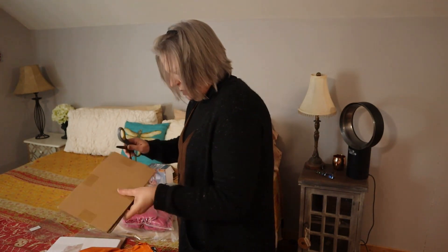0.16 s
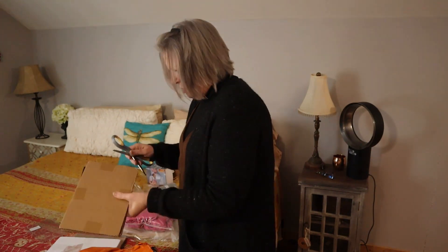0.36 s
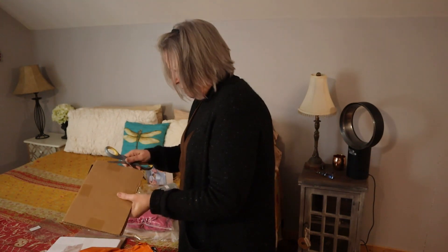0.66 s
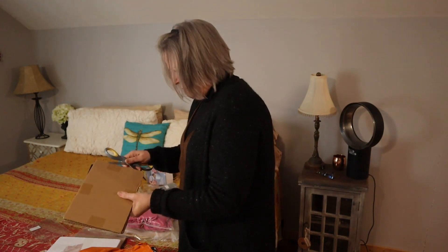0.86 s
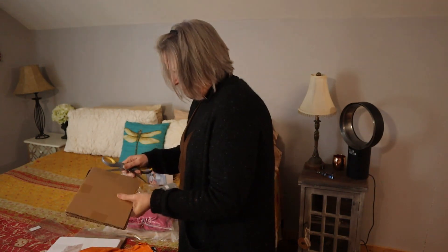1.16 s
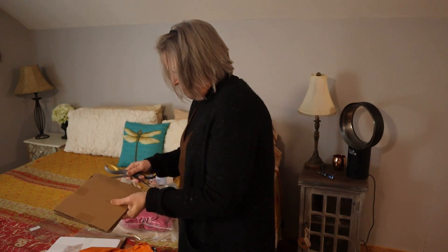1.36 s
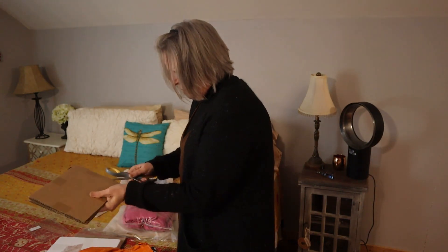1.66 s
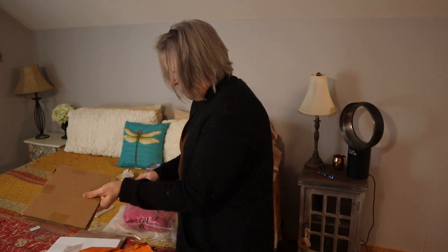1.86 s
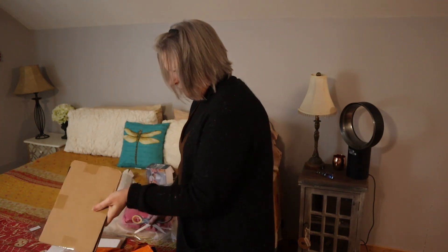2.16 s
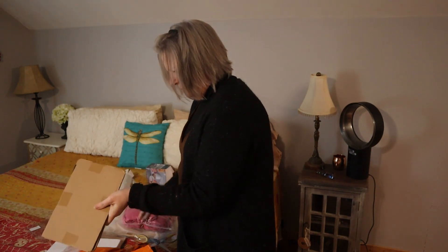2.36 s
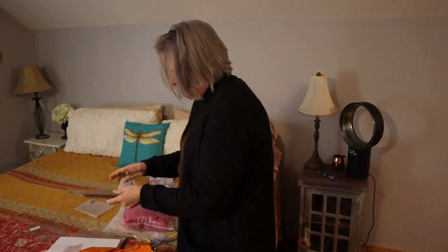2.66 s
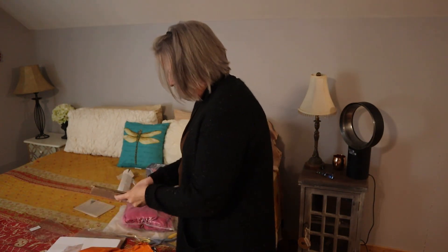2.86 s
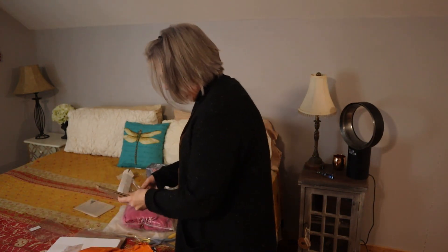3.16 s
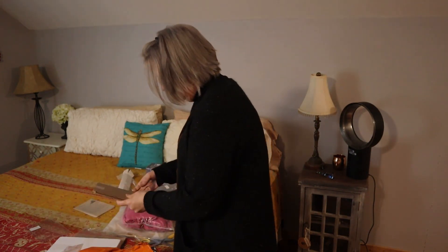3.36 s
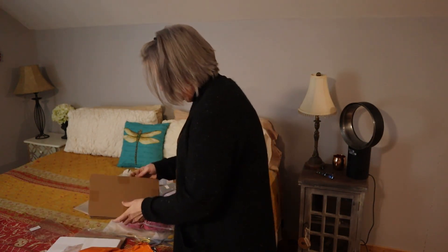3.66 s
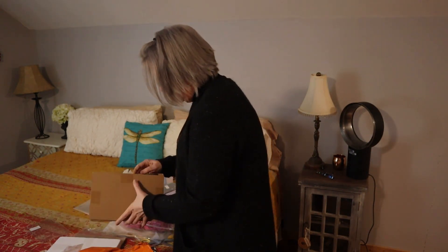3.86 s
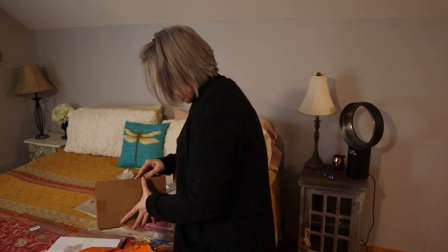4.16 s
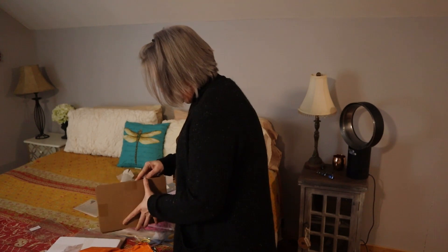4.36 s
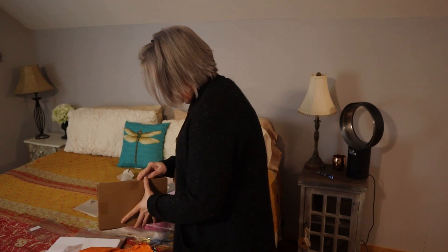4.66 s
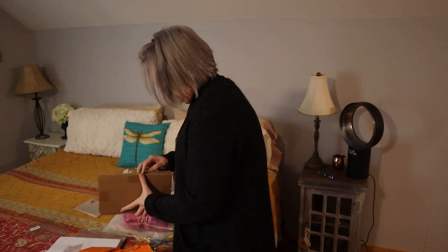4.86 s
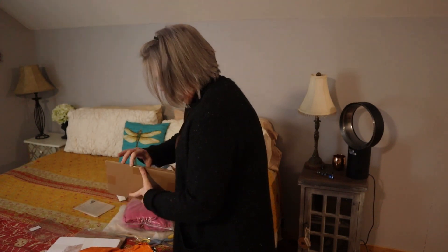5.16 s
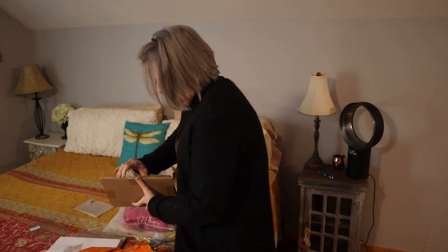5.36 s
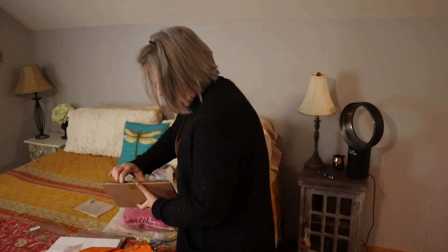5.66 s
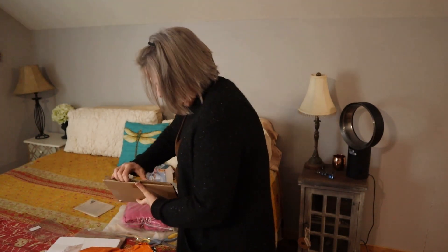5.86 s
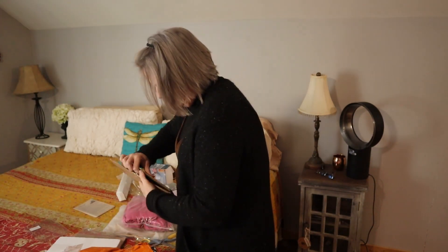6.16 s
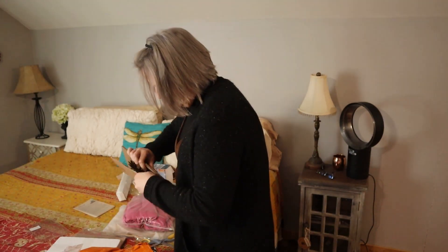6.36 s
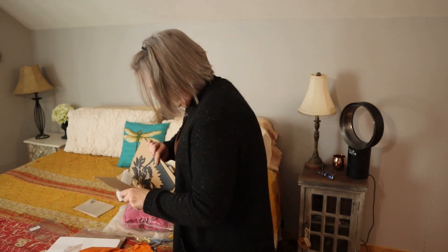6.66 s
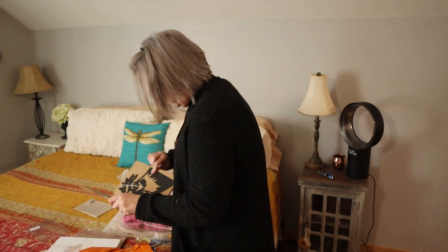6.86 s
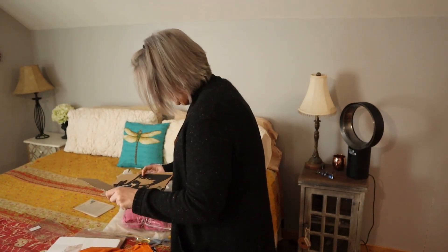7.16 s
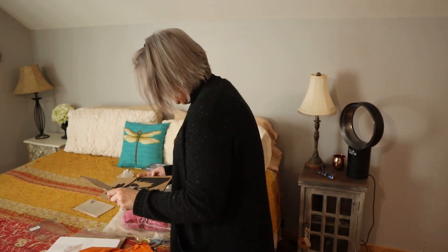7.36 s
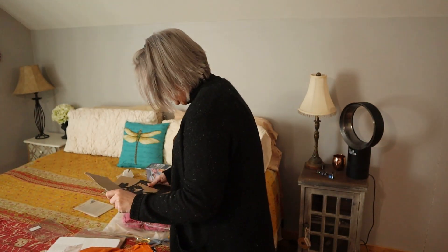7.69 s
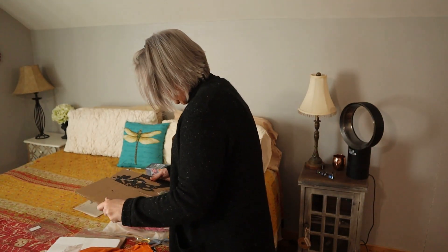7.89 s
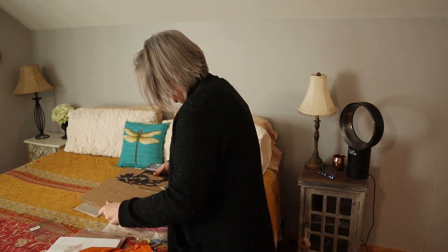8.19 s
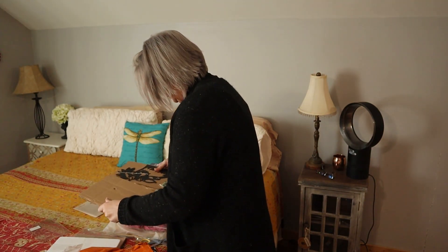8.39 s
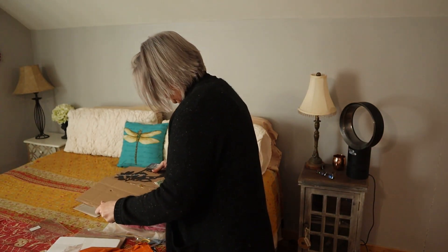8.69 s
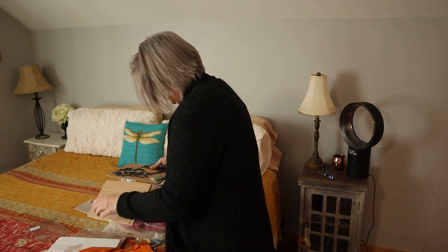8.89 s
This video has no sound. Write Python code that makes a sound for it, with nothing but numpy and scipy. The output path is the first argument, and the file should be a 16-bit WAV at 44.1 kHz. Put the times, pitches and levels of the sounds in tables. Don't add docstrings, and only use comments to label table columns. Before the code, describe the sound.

A small furnished room with steady soft hiss, low rumble and a faint motor hum, heard in stereo from some steps away. At 0 s hands rub cardboard with a light, gritty rasp and small knocks near 0.3-0.4 s, then near quiet. Sharp snaps start at 1.2 s and thicken into a harsh crunching, ripping burst at 1.5-1.85 s. Quiet follows, with a soft knock and crackle around 2.4-2.5 s. From 3.3 to 4.3 s come rasping strokes, snaps and tape ticks; at 4.6-5.3 s brisk ticks and hard cracks. Prying scrapes follow, with a loud double snap at 6.06 s. At 6.57 s a flap tears free with a very loud ringing pop, again at 6.87 s slightly lower, the hiss ducking briefly. Fibre ticks and scrapes continue, with a woody knock at 7.8 s, a strong snap at 8.46 s and last crackles near 8.9 s.

```python
import sys
import numpy as np
from scipy import signal
from scipy.fft import rfft, irfft, next_fast_len
from scipy.io import wavfile
from scipy.ndimage import map_coordinates

SR = 44100
rng = np.random.default_rng(int(sys.argv[2]) if len(sys.argv) > 2 else 0)


def unload_audio(sound):
    columns = np.transpose(np.atleast_2d(sound))
    steps = np.round(np.clip(columns, -1, 1) * 32767)
    wavfile.write(sys.argv[1], SR, steps.astype(np.int16))


def invert_db(level):
    return 10 ** (np.asarray(level, dtype=float) / 20)


N = 398223

# freq_hz, density_db
HISS_SPECTRUM = [(12, -43), (20, 8), (53, -6.5), (222, -8), (263, -8), (348, -10), (501, -10.5),
                 (1070, -17.5), (1260, -16.5), (1980, -19.5), (9750, -25), (12600, -24), (16200, -27)]
# freq_hz, likeness
HISS_LIKENESS = [(60, 0.99), (130, 0.74), (290, 0.41), (640, 0.19), (3000, 0.27), (15000, 0.3)]
# freq_hz, width_hz, level_db
MOTOR_HUM = [(56, 4.3, -62.5), (117.6, 8, -69)]

# start_s, rasp_db
HAND_CONTACT = [(0, -54), (.384, -53), (.558, -72), (1.2, -80), (1.24, -46), (2.2, -70), (3.17, -64),
                (3.6, -46), (4.2, -60), (4.8, -72), (5.0, -47), (5.28, -58), (5.5, -47), (6.45, -46),
                (7.59, -65), (7.95, -41), (8.4, -60), (9.03, -56)]
# peak_s, rasp_db, rise_20db_s, fall_20db_s,
# scrape_over_rasp_db
BOARD_STROKES = [(0.001, -40, .01, .14, -9), (.13, -38, .08, .3, -12), (.23, -46, .15, .25, -12),
                 (1.45, -39, .4, .15, -15), (1.53, -23, .04, .05, -1), (1.785, -20, .06, .06, -6),
                 (1.817, -17, .025, .022, -14), (1.84, -37.5, .02, .23, -5), (3.07, -51, .15, .05, -9),
                 (3.275, -46, .1, .1, -6), (3.408, -40, .4, .05, -19), (3.524, -31.5, .09, .02, -13),
                 (3.74, -30, .2, .2, -10), (4.03, -32, .5, .14, -12), (4.858, -38.5, .09, .8, -8),
                 (5.226, -41, .3, .07, -11),
                 (5.755, -37, .09, .25, -12), (5.925, -31, .16, .045, -9), (6.4, -40, .25, .18, -10),
               (6.51, -43, .3, .04, -12), (6.64, -23, .05, .2, -4), (6.69, -24, .07, .09, -3.5),
               (6.79, -37, .2, .15, -3), (7.33, -38, .07, .1, -10), (7.45, -41, .2, .05, -13),
               (7.678, -30.5, .05, .08, -11), (7.815, -28, .04, .06, -12), (8.11, -32, .08, .15, -14),
               (8.33, -44, .05, .05, -4), (8.447, -22, .025, .09, -16), (8.56, -30, .13, .09, -18),
               (8.878, -30.5, .085, .11, -6)]
# peak_s, rasp_db, fall_20db_s, scrape_over_rasp_db, panel_over_rasp_db
FOLD_CRUNCHES = [(.322, -29, .025, -8, -13), (1.214, -26, .014, -12, -25), (1.616, -17, .018, -8, -8),
                 (1.623, -18, .012, -8, -12), (1.699, -23, .01, -8, -18), (1.734, -21, .025, -5, -7),
                 (1.748, -15, .018, -8, -15), (2.43, -35, .045, 4, 2), (2.514, -26, .075, -6, -5),
                 (2.846, -44, .063, -8, -20), (3.437, -29, .04, -1.5, -7), (3.538, -15, .008, -10, -13),
                 (4.25, -41, .13, -19, -22), (4.49, -41, .07, -8, -14), (4.936, -26, .07, -10, -20),
                 (5.334, -21, .025, -16, -18), (5.34, -30, .07, -6, -4), (6.067, -24, .045, 0, -4),
                 (6.085, -32, .26, -6, -9), (6.592, -15, .14, -3, -9), (6.876, -18.5, .13, -4, -3),
                 (7.228, -42, .4, -14, -25), (7.825, -37, .1, .5, 7), (8.466, -24, .03, -1.5, -10)]
# freq_hz, density_db
RASP_SPECTRUM = [(1470, -49), (2500, -10.5), (3630, -4.5), (3950, -1), (6550, 1), (7950, 0), (10000, -7.5),
                 (15200, -21.5), (16000, -85)]
# freq_hz, density_db
SCRAPE_SPECTRUM = [(700, -5), (1000, 2.5), (2000, 3.5), (3000, -2.5), (4200, -16)]
# freq_hz, width_hz, level_db
PANEL_MODES = [(173, 87, -9), (320, 254, 0.5), (460, 356, 1.5), (680, 177, 1), (880, 217, -10)]

# start_s, peak_db, crack_hz, panel_over_peak_db, panel_hz
PANEL_KNOCKS = [(.3072, -23, 4290, -12, 1380), (.4125, -26.5, 3370, -12, 1850),
                (1.2101, -14, 5500, -21, 1000), (1.3204, -16.5, 7610, -17.5, 1950),
                (1.4351, -23, 4530, -15, 1790), (1.5304, -5.5, 4350, -24, 541),
                (2.4264, -20, 7010, -16, 1520), (3.3162, -13, 6500, -16, 2200),
                (3.4346, -14, 4040, -21, 1390), (3.6711, -18, 6440, -19, 1500),
                (3.6945, -19, 6520, -9, 1010), (4.0277, -15, 6770, -25, 1940),
                (4.4807, -28, 4320, -16, 428), (4.9347, -14, 4480, -18, 1040),
                (5.2984, -18, 4550, -8, 2300), (5.3138, -5, 8680, -24.5, 1430),
                (5.7059, -23.5, 4890, -19, 1040), (6.0573, -4, 5300, -30, 1870),
                (6.0624, -7, 5900, -9, 1870), (6.3974, -21.5, 4750, -13, 1330),
                (7.2315, -17, 4390, -24, 1460), (7.6271, -30, 6590, -14, 1480),
                (7.7967, -12.5, 4480, -20.5, 312), (8.4642, -8, 3600, -27, 1500),
                (8.9905, -19, 6420, -17.5, 875)]
# start_s, peak_db, crack_hz, panel_over_peak_db, panel_hz
TEARING_SNAPS = [(.3227, -36, 6220, -21, 1730), (1.5179, -18.5, 5290, -11.5, 794),
                 (1.611, -10, 7600, -17, 606), (1.694, -19, 6670, -19.5, 961),
                 (1.731, -16, 5920, -20.5, 447), (1.8113, -18.5, 6420, -3, 1890),
                 (2.4972, -30, 2760, -8, 700), (3.5169, -24, 4500, -24, 1430),
                 (3.5354, -17, 4950, -12, 1390), (5.1951, -21.5, 6720, -27, 1650),
                 (5.3338, -18, 8200, -29, 2000), (5.7498, -19, 7260, -20.5, 1340),
                 (5.9145, -16.5, 5880, -22, 1320), (6.113, -19, 3900, -32, 1910),
                 (7.008, -19, 4200, -40, 589), (7.458, -24, 7120, -24, 1370), (7.8171, -12, 5900, -17, 323),
                 (7.981, -28, 5500, -20, 1150), (7.9915, -24, 5300, -14, 1150),
                 (8.1015, -18.5, 7880, -25, 1380), (8.4517, -19, 5540, -24, 1930),
                 (8.8667, -11.5, 5550, -28, 1140)]
# start_s, peak_db, crack_hz
FIBRE_TICKS = [(.9732, -35.5, 4280), (1.1049, -38, 3890), (2.8414, -28, 4140), (3.0654, -31, 2500),
               (3.1996, -31, 6290), (3.272, -19, 3700), (3.4106, -26, 3650), (3.6262, -33, 6080),
               (3.907, -22, 5400), (4.1475, -23, 6070), (4.2368, -8.5, 6490), (4.6284, -33, 6750),
               (4.6723, -32, 4970), (4.8499, -19.5, 6750), (4.8918, -19.5, 5020), (4.9636, -8, 6530),
               (5.0419, -15, 6390), (5.0973, -19, 5600), (5.1143, -18, 5520),
               (5.5074, -23, 5000), (5.5847, -17, 5320), (5.8401, -21.5, 6910), (6.2492, -19, 7390),
               (6.349, -24, 5970), (6.5176, -19, 6800), (7.0683, -19.5, 4090), (7.1197, -23, 7570),
               (7.1801, -29, 6710), (7.2789, -24, 2710), (7.3093, -22, 6390), (7.3292, -24, 4830),
               (7.5986, -34, 2930), (7.6635, -10.1, 6410), (7.7523, -15, 6190), (7.7727, -20, 5430),
               (7.9299, -21, 5500), (8.137, -26, 2500), (8.0372, -19, 5190), (8.0865, -20.5, 4920),
               (8.2077, -18, 5080), (8.331, -21.5, 6230), (8.8333, -25, 7510), (8.8473, -25, 4670),
               (8.9221, -14, 5140),
               (1.2958, -30, 4000), (1.3521, -29, 8000), (1.5091, -18, 5000), (1.5184, -10, 5300),
                 (1.5483, -11, 4300), (1.6062, -5, 6000), (1.648, -17, 4300), (1.7467, -9, 6000),
                 (1.7817, -14, 6300), (1.8115, -8, 5900), (1.8175, -15, 5500), (8.4368, -21, 6500),
                 (8.4515, -15, 5000), (8.5441, -22, 5000), (8.567, -23, 5200), (8.514, -24, 4800),
                 (5.3305, -20, 6000), (7.918, -28, 4500), (1.9587, -27, 4000), (2.4342, -25, 7100),
                 (2.5226, -17, 6300), (3.2882, -24, 4100), (3.3444, -21, 6500), (3.3907, -27, 6100),
                 (3.7274, -24, 7800), (3.9903, -21, 6600), (4.0153, -21, 7300), (4.1581, -26, 6000),
                 (5.3347, -13, 8500), (5.6274, -30, 6600), (6.1132, -14, 3800), (6.1885, -26, 5000),
                 (6.4504, -28, 7900), (6.4773, -27, 4800), (6.8845, -9, 5200), (7.0105, -14, 4400),
                 (7.3185, -24, 5400), (7.6975, -25, 6900), (7.8194, -13, 4900), (8.2537, -32, 6800),
                 (8.8901, -20, 5500)]

# start_s, peak_db, pitch_hz
LANDINGS = [(2.427, -32, 167), (2.54, -33.5, 174), (5.0, -40, 330), (5.921, -47, 120),
            (3.5365, -15.5, 1480), (3.546, -27, 1030), (3.712, -32, 1050), (6.94, -26, 870),
            (2.437, -32, 1500), (2.508, -30, 520), (5.345, -24, 2500), (7.828, -26.5, 325),
            (3.75, -26, 1140), (1.818, -17.5, 1900), (6.573, -33, 210), (6.868, -22, 170),
            (7.817, -30, 340), (6.785, -24, 600), (1.61, -32.5, 330)]
# peak_s, level_db, pitch_hz, width_hz, fade_20db_s
EDGE_SQUEAKS = [(4.055, -32, 7200, 1800, .14), (4.9, -44, 5000, 220, .05), (5.53, -50, 5000, 220, .1),
                (5.715, -44, 5000, 220, .06), (7.445, -35, 7200, 1500, .07), (5.21, -38, 8500, 3000, .05),
                (5.336, -28, 8700, 2500, .03), (5.38, -40, 9200, 1500, .08), (1.75, -22, 6300, 1500, .02),
                (1.79, -26, 6100, 1200, .03), (3.57, -43, 1380, 400, .06), (3.605, -45, 1330, 400, .03),
                (8.55, -36, 5000, 700, .08), (1.88, -44, 1900, 250, .1), (6.42, -53, 2800, 1200, .2)]
# start_s, peak_db, pitch_hz, cycles_to_die
FLAP_RINGS = [(6.5726, 1, 3400, 11), (6.5727, -5, 6000, 12), (6.573, -6, 680, 6), (6.5748, -4, 4500, 12),
              (6.5752, -7, 8000, 20), (6.5772, -10, 6500, 14), (6.5814, -4, 2300, 10),
              (6.5735, -9, 2000, 6), (6.5818, -14, 7800, 16), (6.5857, 0, 4600, 16), (6.586, -8, 7800, 16),
              (6.594, -9, 4500, 12), (6.8682, -3, 470, 8), (6.868, -9, 5600, 16), (6.8855, -9, 5400, 14),
              (6.872, -14, 1500, 8), (6.8685, -12, 2500, 8), (6.8815, -11, 4200, 12), (6.886, -17, 450, 10),
              (6.898, -19, 560, 12), (8.4645, -14, 3300, 10), (8.4667, -13, 4900, 10),
              (8.4735, -19, 3600, 10), (3.3192, -13, 5100, 20), (3.3172, -20, 8500, 16),
              (4.9648, -18, 4400, 14), (4.938, -22, 3000, 12), (5.345, -21, 2500, 12),
              (3.2765, -27, 3000, 10), (5.3378, -14, 2400, 11), (5.335, -16, 8200, 20),
              (8.0402, -22, 5000, 12), (7.848, -31, 430, 30), (7.818, -24, 480, 14), (6.114, -20, 3600, 14),
              (6.063, -17, 1800, 12), (1.8185, -17, 2000, 12)]
# start_s, peak_db, panel_db, panel_hz
FLAP_POPS = [
    (6.5727, 0, -13, 650),
    (6.868, -4, -14, 480),
]
# freq_hz, width_hz, level_db
GLUE_MODES = [(1810, 1000, -11), (3400, 1400, -3), (5000, 1740, 0), (8150, 4500, -6.5)]

# delay_s, left_db, right_db
BED_ECHO = [(.0021, -1, -2)]
# delay_s, left_db, right_db
WALL_ECHOES = [(.0088, -12, -9), (.0115, -9, -17.5), (0.0132, -8, -8), (.017, -12, -9), (.0215, -13.5, -14)]
# delay_s, left_db, right_db
POP_ECHOES = [(.0027, -3, -4), (.009, -9, -7), (.0137, -4.5, -4.5), (.0175, -10, -10), (.0218, -8, -8)]
# freq_hz, t60_s
ROOM_DECAY = [(150, 0.16), (600, 0.34), (2000, 0.33), (6000, 0.28), (12000, 0.23)]
# freq_hz, likeness
ROOM_LIKENESS = [(100, .9), (500, 0.21), (3000, 0.27), (10000, 0.25)]


def unit(x):
    return x / np.sqrt(np.mean(x ** 2) + 1e-20)


def topped(x):
    return x / np.abs(x).max(axis=-1, keepdims=True)


def along(points, hz):
    f, v = np.transpose(points)
    return np.interp(np.log(hz + 1), np.log(f + 1), v)


def filtered(x, response):
    m = next_fast_len(x.shape[-1] + SR // 16)
    return irfft(rfft(x, m) * response(np.fft.rfftfreq(m, 1 / SR)), m)[..., :x.shape[-1]]


def peak(f, hz, width_hz):
    return 1j * f * width_hz / (hz * hz - f * f + 1j * f * width_hz)


def modes(f, table):
    return sum((-1) ** k * invert_db(db) * peak(f, hz, w) for k, (hz, w, db) in enumerate(table))


def pair(noises, likeness):
    def mid_side(hz):
        angle = np.arccos(np.clip(along(likeness, hz), -1, 1)) / 2
        return np.array([np.cos(angle), np.sin(angle)])

    mid, side = filtered(noises, mid_side)
    return np.array([mid + side, mid - side])


def overlaid(start_s, sounds, length):
    at = np.round(start_s * SR).astype(int) + np.arange(sounds.shape[1])
    return np.bincount(at.ravel(), sounds.ravel(), length)[:N]


def background():
    noises = pair(rng.standard_normal((2, N)), HISS_LIKENESS)
    hiss = unit(filtered(noises, lambda f: invert_db(along(HISS_SPECTRUM, f)) * f ** 2 / (f ** 2 + 35 ** 2)))
    hum = np.zeros(N)
    for hz, width_hz, db in MOTOR_HUM:
        hum += invert_db(db) * unit(filtered(rng.standard_normal(N), lambda f: peak(f + 1e-3, hz, width_hz)))
    return invert_db(-50) * hiss + hum


def duck(start_s, depth_db, hold_s):
    t = np.arange(N) / SR - start_s
    back_s = .12
    return invert_db(np.interp(t, [0, 0, hold_s, hold_s + back_s], [0, depth_db, depth_db, 0]))


def pressure():
    t = np.arange(0, N + 64, 64) / SR
    crunch_rise_s, stroke_panel_db = .008, -7
    rows = [(s, db, crunch_rise_s, fall, scrape, panel) for s, db, fall, scrape, panel in FOLD_CRUNCHES]
    rows += [(*row, row[-1] + stroke_panel_db) for row in BOARD_STROKES]
    s, db, rise_s, fall_s, scrape_db, panel_db = np.transpose(rows)[..., None]
    swell_db = db - 20 * np.maximum((s - t) / rise_s, (t - s) / fall_s)
    hands_db = np.interp(t, *np.transpose(HAND_CONTACT))

    def layer(over_db, hands_over_db, rest_db):
        strokes = (invert_db(swell_db + over_db) ** 2).sum(axis=0)
        power = strokes + invert_db(hands_db + hands_over_db) ** 2 + invert_db(rest_db) ** 2
        return np.interp(np.arange(N) / SR, t, np.sqrt(power))

    return layer(0, 0, -120), layer(scrape_db, -11, -71), layer(panel_db, -14, -65)


def wobble(rate_hz):
    return map_coordinates(rng.standard_normal(int(N * rate_hz / SR) + 4), [np.arange(N) * rate_hz / SR])


def grit(density_hz, spread_db, clump_db):
    hits = rng.random(N) < density_hz / SR
    sizes = invert_db(spread_db * np.minimum(rng.exponential(size=N), np.e))
    ticks = hits * sizes * rng.uniform(-0.92, 1, N)
    return unit(invert_db(clump_db * wobble(45)) * (unit(ticks) + 1.1 * rng.standard_normal(N)))


def rubbing():
    bright, dull, deep = pressure()
    fine = grit(density_hz=1600, spread_db=1.5, clump_db=1.8)
    coarse = grit(density_hz=900, spread_db=2.5, clump_db=2.8)
    rasp = unit(filtered(fine, lambda f: invert_db(along(RASP_SPECTRUM, f))))
    scrape = unit(filtered(0.55 * fine + coarse, lambda f: invert_db(along(SCRAPE_SPECTRUM, f))))
    panel = unit(filtered(coarse, lambda f: modes(f, PANEL_MODES) * f ** 2 / (f ** 2 + 190 ** 2)))
    return bright * invert_db(-1.8) * rasp + dull * invert_db(-4.5) * scrape + deep * invert_db(-5.5) * panel


def snaps():
    snap_ms, tear_ms = .3, 2.4
    tick_panel_db, tick_panel_hz = -34, 600
    rows = [(*row, tear_ms) for row in TEARING_SNAPS] + [(*row, snap_ms) for row in PANEL_KNOCKS]
    ticks = FIBRE_TICKS
    rows += [(*row, tick_panel_db, tick_panel_hz, snap_ms) for row in ticks]
    s, db, crack_hz, panel_db, panel_hz, rise_ms = np.transpose(rows)[..., None]

    t = np.arange(SR // 20) / SR
    u = t * 1000 / rise_ms
    burst = 0.35 * rng.standard_normal((len(s), len(t))) * u * np.exp(-u)
    burst[:, 0] += 1

    def crack_tone(f):
        broad = peak(f, crack_hz, 1.2 * crack_hz) ** 2
        pitched = .7 * peak(f, crack_hz, .25 * crack_hz)
        return (broad + pitched) * peak(f, 6210, 14000)

    def panel_tone(f):
        return peak(f, panel_hz, 0.69 * panel_hz) * peak(f, 1.14 * panel_hz, 1.2 * panel_hz)

    crack = topped(filtered(burst, crack_tone))
    ring = topped(filtered(burst, panel_tone))
    sound = invert_db(db + .6) * crack + invert_db(db + panel_db + 2.5) * ring
    snap_lag_s = .0011
    return overlaid(s + snap_lag_s * (rise_ms < 1), sound, N + SR)


def thuds():
    out, t = np.zeros(N + SR), np.arange(SR // 8) / SR
    for s, db, hz in LANDINGS:
        out[round(s * SR):][:len(t)] += np.sin(2 * np.pi * hz * t) * invert_db(db - 60 * t * hz / 9)
    return out[:N]


def squeaks():
    out, t = np.zeros(N), np.arange(-SR // 4, SR // 4) / SR
    for s, db, hz, width_hz, fade_s in EDGE_SQUEAKS:
        band = unit(filtered(rng.standard_normal(len(t)), lambda f: peak(f, hz, width_hz) ** 2))
        out[round(s * SR) - SR // 4:][:len(t)] += invert_db(db - 20 * np.abs(t) / fade_s) * band
    return out


def rings():
    s, db, hz, cycles = np.transpose(FLAP_RINGS)[..., None]
    t = np.arange(SR // 8) / SR
    swing = np.sin(2 * np.pi * hz * t) * invert_db(-60 * t * hz / cycles) * (1 - np.exp(-4 * t * hz))
    sound = filtered(invert_db(db) * topped(swing), lambda f: (1j * f / (.3 * hz + 1j * f)) ** 2)
    return overlaid(s, sound, N)


def pops():
    out, t = np.zeros(N + SR), np.arange(SR // 8) / SR
    for s, db, panel_db, hz in FLAP_POPS:
        burst = invert_db(-60 * t / .0012) + .45 * rng.standard_normal(len(t)) * invert_db(-60 * t / .009)
        crack = filtered(burst, lambda f: modes(f, GLUE_MODES) / (1 + 1j * f / 9000) ** 2)
        boom = filtered(burst, lambda f: peak(f, hz, .5 * hz) - 0.53 * peak(f, 2.23 * hz, 1.04 * hz))
        out[round(s * SR):][:len(t)] += invert_db(db) * topped(crack) + invert_db(panel_db) * topped(boom)
    return out[:N]


def near(x, walls, direct=1):
    lead_s = 3.1e-5
    side = np.array([[.5], [-.5]])

    def paths(f):
        echoes = sum(invert_db([[left], [right]]) * np.exp(-2j * np.pi * f * s) for s, left, right in walls)
        return (direct + echoes) * np.exp(2j * np.pi * f * lead_s * side) * invert_db(0.17 * side)

    return filtered(x, paths)


def scattered(x):
    t_ms = np.arange(SR // 100) / SR * 1000
    puff = rng.standard_normal(len(t_ms)) * np.exp(-t_ms / 1.2)
    return signal.fftconvolve(x, puff / np.linalg.norm(puff))[:N]


def room(x, count=3):
    out, slot = np.zeros((2, N)), np.arange(N) // (SR // 7) % count
    for k in range(count):
        hz, _, z = signal.stft(rng.standard_normal((2, SR // 2)), SR, nperseg=256)
        decay = lambda t: invert_db(-60 * t / along(ROOM_DECAY, hz)[:, None])
        tail = signal.istft(z * decay(_), SR, nperseg=256)[1]
        tail = pair(tail, ROOM_LIKENESS)
        tail *= 1 - np.exp(-np.arange(tail.shape[1]) / SR / .012)
        part = (x * (slot == k))[None]
        out += signal.fftconvolve(part, tail / np.linalg.norm(tail[0]), axes=1)[:, :N]
    return out


def scene():
    first_pop_s, second_pop_s = FLAP_POPS[0][0], FLAP_POPS[1][0]
    rest = background() * duck(first_pop_s, -9, hold_s=.16) * duck(second_pop_s, -5, hold_s=.36)
    rubbed = rubbing()
    snapped = snaps()
    booming = thuds() + pops()
    squeaking = squeaks()
    ringing = rings()
    tail = room(invert_db(-4) * snapped + invert_db(-2.5) * booming + invert_db(-5.5) * rubbed + invert_db(-11) * ringing)
    sharp = near(snapped, BED_ECHO) + near(scattered(snapped), WALL_ECHOES, direct=0)
    sharp = sharp + near(booming, POP_ECHOES)
    return sharp + near(rubbed + squeaking + ringing, []) + tail + rest


def top_cut(x):
    return signal.sosfilt(signal.butter(12, 15850, fs=SR, output="sos"), x)


def record(dry):
    heard = filtered(dry, lambda f: 1j * f / (45 + 1j * f))
    over_db = np.maximum(20 * np.log10(np.abs(heard).max(axis=0) + 1e-9) + .5, 0)
    climb_db = 110 * np.arange(N) / SR
    cut_db = np.maximum.accumulate(over_db + climb_db) - climb_db
    cut_db = signal.lfilter([1 / 800], [1, 1 / 800 - 1], cut_db)
    return top_cut(np.clip(heard * invert_db(-cut_db), -1, 1))


dry = scene()
out = record(dry)
unload_audio(out)
```